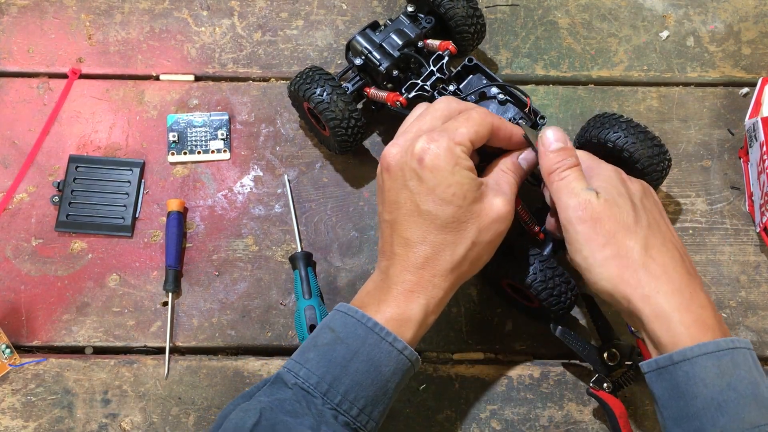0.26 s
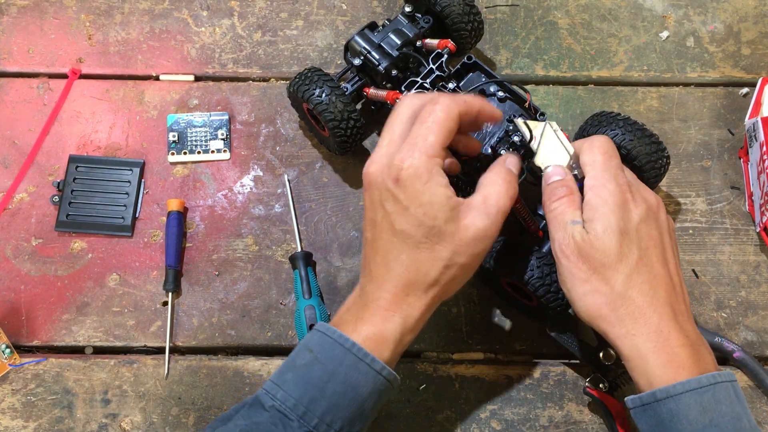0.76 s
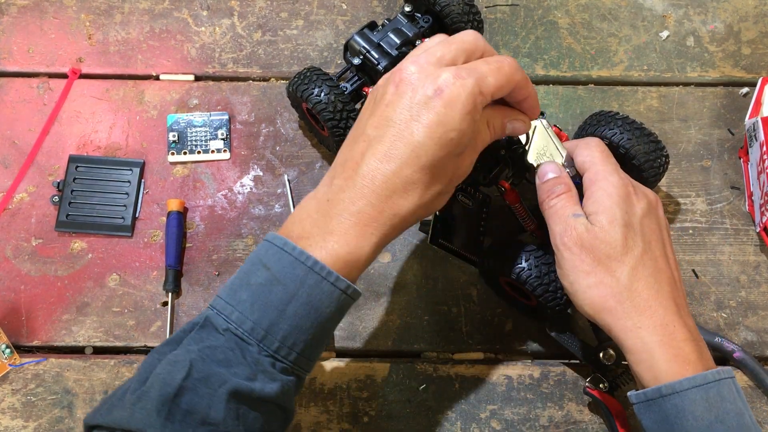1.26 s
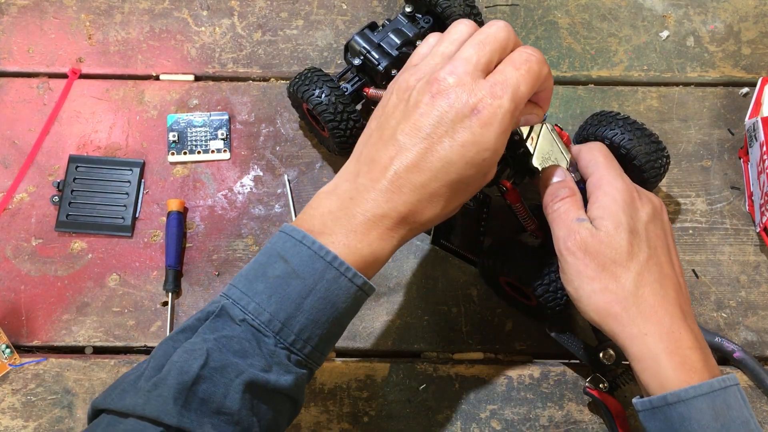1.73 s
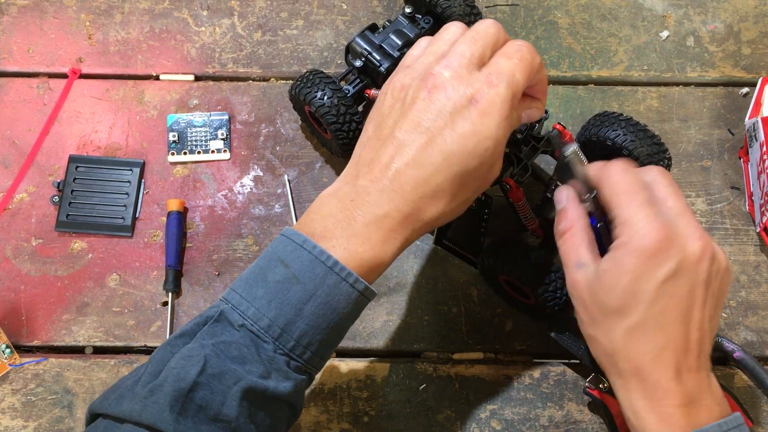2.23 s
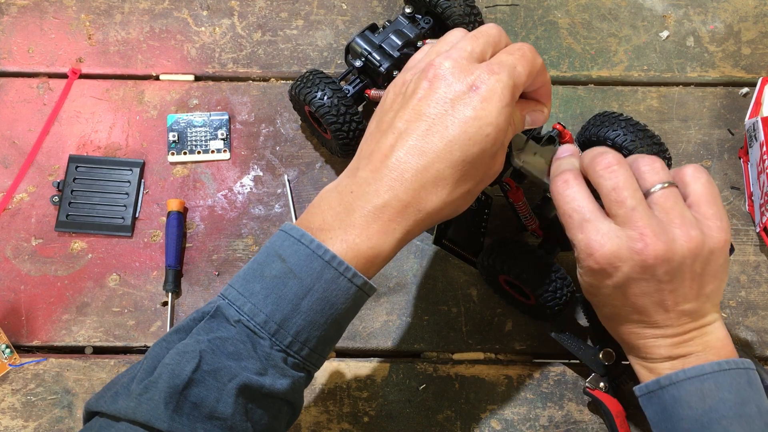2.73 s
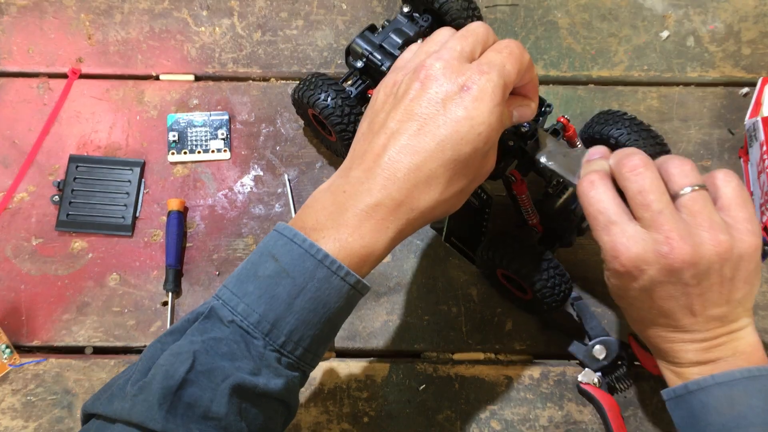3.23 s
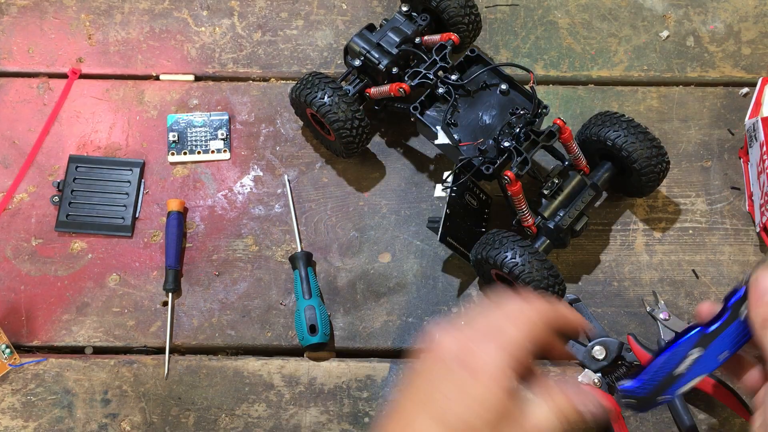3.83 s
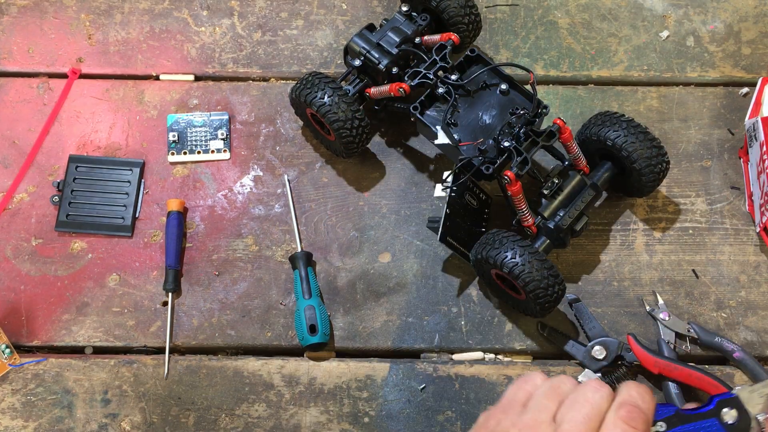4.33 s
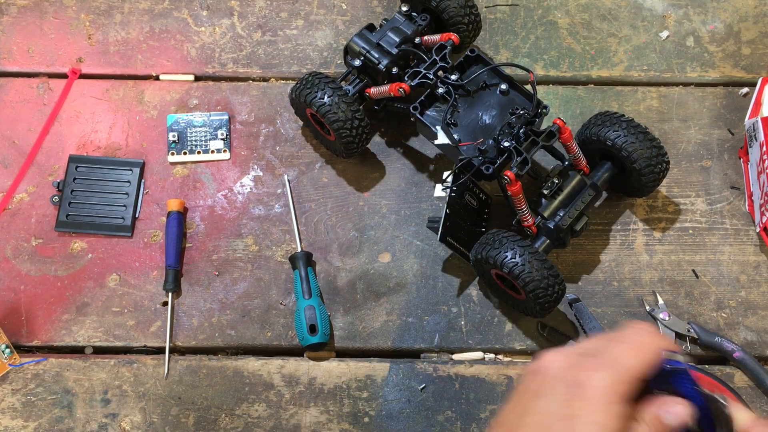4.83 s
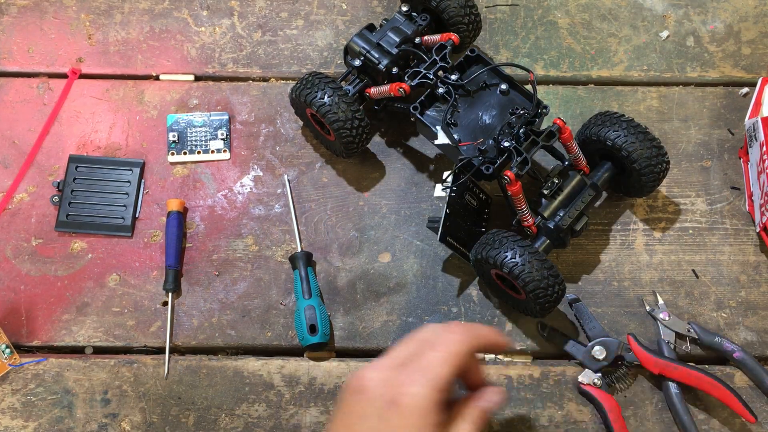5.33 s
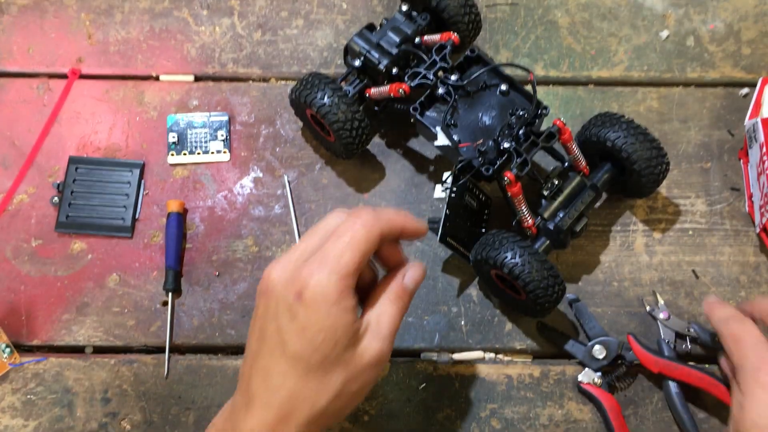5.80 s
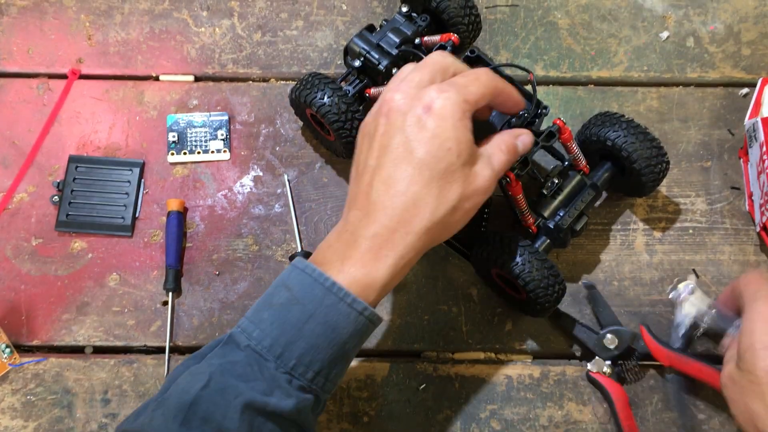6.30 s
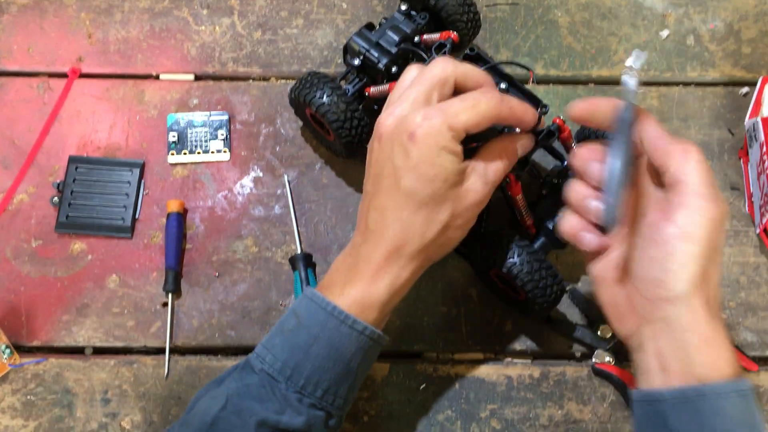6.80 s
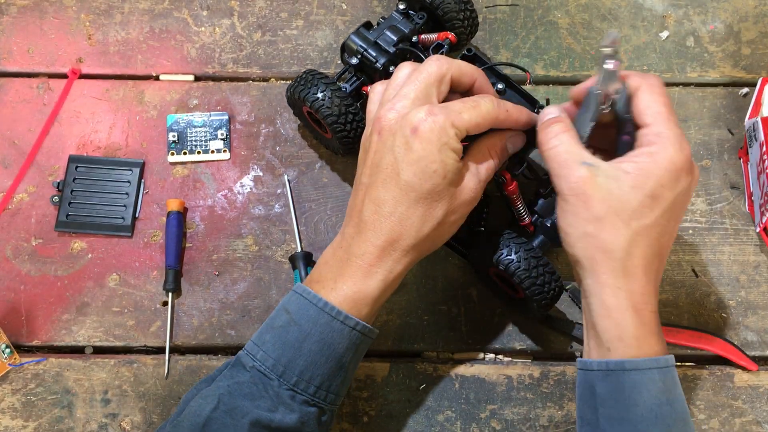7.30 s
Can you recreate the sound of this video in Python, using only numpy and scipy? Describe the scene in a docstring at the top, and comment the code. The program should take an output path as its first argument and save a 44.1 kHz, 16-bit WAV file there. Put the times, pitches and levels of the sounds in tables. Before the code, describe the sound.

Close bench work in a small shed. Barely audible metal ticks at first, then a low woody knock with a steel clink around three seconds. Soft latch clicks lead to one very loud, bright snap of a folding multi-tool near five seconds, followed by tools clattering on planks, a few softer bumps and a firm double knock. Faint low hum and hiss, short room tail.

```python
"""Bench work in a shed

Steel ticks and a loud snap from a folding knife, among knocks, drags and clatter on wooden planks, most
of them late. Ticks are gritty contacts ringing steel; knocks are bouncing blows ringing plank modes; slides
are grainy friction. Near echoes and a room tail surround them; a far machine hums over shaped room noise.
"""
import sys
import numpy as np
from scipy import signal
from scipy.fft import rfft, irfft
from scipy.io import wavfile
from scipy.ndimage import uniform_filter1d

SR = 44100
rng = np.random.default_rng(int(sys.argv[2]) if len(sys.argv) > 2 else 0)


def output_pcm(signal):
    """Save a mono or channel-first signal as 16-bit PCM at the path in sys.argv[1].

    Samples are clipped to [-1, 1] before scaling.
    """
    pcm = np.clip(np.atleast_2d(signal).T, -1, 1) * 32767
    wavfile.write(sys.argv[1], SR, np.round(pcm).astype(np.int16))


N = 332955  # length [samples]

# Metal ticks: (time [s], direct peak [dB], centre [Hz], spread [octaves, at least 0.2])
STEEL_TICKS = [(0.313, -52.5, 2820, 0.36), (0.613, -50, 7030, 0.64), (.806, -49, 1950, 0.42),
               (1.091, -41, 3370, 0.75), (1.253, -53, 4930, 0.62), (1.508, -45.5, 7450, 0.73),
               (2.843, -42, 4630, 1), (3.114, -49.5, 2400, 0.81), (3.198, -20, 2460, 0.55),
               (3.284, -34.5, 2220, 0.76), (3.339, -25, 5360, 1.4), (3.412, -42.5, 2580, 0.79),
               (3.668, -52.5, 4900, 0.97), (3.758, -52.5, 3000, 0.34), (4.934, -3, 4900, 0.71),
               (5.338, -49.5, 4470, 0.54), (5.473, -18, 2026, 1.2), (5.611, -41, 3440, 0.68),
               (5.745, -14, 4300, 0.87), (5.81, -13.5, 4330, 0.81), (6.442, -42.5, 3040, 0.97),
               (6.592, -20.5, 2520, 0.46), (6.673, -22, 2500, 0.35), (6.677, -25, 2640, 0.13),
               (6.735, -35.5, 2200, 0.2)]
# Clicks of the knife's latch: (time [s], direct peak [dB], centre [Hz], spread [octaves])
LATCH_CLICKS = [(4.446, -53, 2750, 0.9), (4.587, -35, 3220, 1.5), (4.709, -43, 3600, 1)]
# Resonances of blade and jaws: (centre [Hz], width [Hz], mean level [dB])
STEEL_MODES = [(1540, 250, -7), (2164, 110, 10), (3070, 830, -2.5), (3680, 100, -4), (4200, 260, 1.5),
               (5000, 420, -5), (5770, 440, -4), (8040, 450, -3), (8800, 840, -6.5), (11450, 1100, -1),
               (13150, 2200, -7)]
# Resonances of the latch: (centre [Hz], width [Hz], mean level [dB])
LATCH_MODES = [(2540, 130, 2), (2950, 360, -3.5), (4500, 400, -10), (5750, 620, -13), (9100, 690, 1)]
CONTACT_MS = 0.68  # time scale of the contact's swell and fade

# A loose jaw sings until it lands again: (start [s], end [s], tones (pitch [Hz], level [dB], t60 [s]))
JAW_RING = (5.533, 5.611, [(4200, -54, 0.11), (5780, -51, 1), (7500, -62, 0.43)])

# Knocks on the bench: (time [s], direct peak [dB], centre [Hz], spread [octaves, at least 0.2],
# rattle t60 [s, at least 0.01], clatter level against the plank modes [dB])
BENCH_KNOCKS = [(0.768, -45.5, 330, 1.3, 0.3, -9.5), (.82, -39, 121, 1.16, 0.046, -27),
                (0.847, -43.5, 112, 0.77, 0.025, -22), (1.092, -42, 1140, 0.36, 0.0097, 11),
                (3.185, -28.5, 245, 0.12, 0.03, -46), (3.198, -15, 256, 1.06, 0.031, -8),
                (3.222, -23.5, 160, 1.9, .04, -4), (3.261, -19.5, 170, 1.93, 0.12, -14),
                (3.34, -30.5, 334, 0.63, 0.073, -12), (3.413, -40, 586, 1.2, 0.033, -12),
                (5.472, -12.5, 1000, 0.49, 0.1, -3.5), (5.533, -17, 520, 0.66, 0.036, -12),
                (5.61, -19, 398, 1.5, 0.11, -23.5), (5.744, -20.5, 534, 1.07, 0.23, -12.5),
                (5.809, -18, 700, 1.2, 0.1, -46), (6.006, -28, 650, 1.1, 0.14, -14.5),
                (6.098, -21, 581, 0.47, 0.078, -27), (6.131, -33, 600, 0.88, 0.11, -7.5),
                (6.295, -29, 200, 0.88, 0.31, -18), (6.317, -30.5, 260, 0.99, 0.03, -15),
                (6.403, -29, 420, 0.6, 0.12, -20.5), (6.442, -32.5, 516, 1.07, 0.21, -8),
                (6.498, -34.5, 134, 0.91, 0.051, -28), (6.599, -10, 640, 0.58, 0.073, -12.5),
                (6.621, -14.5, 600, 0.4, 0.027, -8), (6.665, -19, 536, 1.15, 0.19, -15)]
# Plank modes before spot and grip: (pitch [Hz], mean level [dB], t60 [s])
PLANK_MODES = [(130.1, 13.5, 0.35), (207.4, -12.5, 0.077), (276, 8.5, 0.07), (340.5, 8, 0.22),
               (415, -5.5, 0.068), (521, 0, 0.12), (571, 5.5, 0.045), (661.6, 1, 0.11), (738, -8.5, 0.22),
               (902, -4, 0.097), (1020, 4, 0.06), (1155, -7, 0.36), (1514, -36, 0.065), (2154, -18.5, 0.06)]
MODE_FLOOR = 0.032  # share of every blow that reaches all the modes
SPOT_SHIFT = 0.015  # each blow lands on another spot or plank: spread of the upper modes' pitch, as a share
GRIP = 0.55  # a hand or tool lying on the plank shortens its upper modes to this share
CLATTER_HZ, CLATTER_OCTAVES = 1427, 0.54  # hard tool edges chatter on the wood

# Slides of steel, blade in its handle or pliers on the planks:
# (start [s], length [s], level at the top of the swell [dB], brightest [Hz])
SLIDES = [(0.758, 0.074, -64, 2970), (4.752, 0.025, -60, 5160), (4.907, 0.018, -46, 4600),
          (4.914, 0.031, -53, 3520), (6.103, 0.89, -53, 2380)]
# Resonances of sliding steel, each also passed at double width: (centre [Hz], width [Hz], level [dB])
SLIDE_MODES = [(1600, 380, 7), (2386, 260, 8), (3930, 450, -9.5), (5200, 600, -4.5), (6560, 3900, -8)]
SLIDE_TOP_AT, SLIDE_ENDS_DB = 0.66, -16.5  # share of the length where it is loudest; level at its ends
SWISH = 0.64  # broad noise beside the resonances of a slide

# Decay of the room tail: (frequency [Hz], t60 [s])
ROOM_DECAY = [(100, 0.57), (400, 0.48), (1500, 0.31), (4500, 0.4), (9000, 0.34), (16000, 0.16)]
# Near echoes: (delay [s], level [dB])
NEAR_ECHOES = [(.0022, -15.5), (.0048, -16.5), (0.0098, -14.5), (0.0169, -24.5)]
WALLS_STEEL_DB, WALLS_WOOD_DB = -6.5, -4.5  # send of steel and wood to the room tail

# Hum levels before their waver: (time [s], upper line [dB rms], lower line [dB rms])
HUM_LEVELS = [(0, -71, -69), (1.6, -61.5, -72), (3.1, -54.5, -60), (3.5, -61, -62), (3.8, -55, -55),
              (4.85, -61.5, -60.5), (5.1, -70.5, -69.5), (7.55, -70.5, -73)]
HUM_HZ, SAG_PER_S = (156.5, 88.5), 0.011  # starting pitches; share of them lost each second
# Faint thin tones before their waver: (pitch [Hz], level [dB rms])
WHINE_TONES = [(229, -83.5), (600, -86), (959, -84)]

# Colour of the room noise, evened in level before use: (frequency [Hz], density [dB per Hz])
AIR_COLOUR = [(15, -9.5), (35, 3.5), (60, -2.5), (130, -1.5), (220, -9), (400, -17), (800, -21),
              (1600, -20), (3200, -26), (6000, -29.5), (9000, -32.5), (10500, -36.5), (12800, -30.5),
              (16000, -45)]
# Setting of the hiss before lift and patches: (time [s], level [dB])
HISS_LEVELS = [(0, -65), (3.0, -65.5), (3.6, -60.5), (4.5, -62.5), (5.5, -64.5), (6.9, -57), (7.55, -60)]
RUMBLE_DB = -59  # resting level of the rumble
SHAKE_DB, SHAKE_S = -13.5, 0.044  # rumble the knocks send through the bench: level under them, smoothing
# The noise suppressor lets the hiss up after a loud crack: threshold, hold, lift
OPENS_DB, HOLD_S, LIFT_DB = -17, 0.405, 7
EDGE_HZ = 16100  # band limit


def tick(modes, db, centre_hz, octaves):
    """A short gritty contact rings the broad modes of the steel; the walls hear one smooth, weaker click."""
    t = np.arange(1500) / SR * 1000 / CONTACT_MS
    grit = t ** 2 * np.exp(-t) * rng.standard_normal(len(t))
    spectrum = rfft(grit)
    even_spectrum = spectrum / uniform_filter1d(abs(spectrum), size=25)
    grit = irfft(even_spectrum, len(t)) * (t < 9)
    wall_click = 0.66 * np.linalg.norm(grit) * signal.unit_impulse(len(t))
    contact = np.array([grit, wall_click])
    spot_db = 1.5 * rng.standard_normal(len(modes))
    ring = 0
    for (hz, width, level_db), spot in zip(modes, spot_db):
        gain = amp(level_db + spot) * favour(hz, centre_hz, octaves)
        ring = ring + gain * resonate(contact, hz, width)
    edge = 0.18 * evened(band(contact, centre_hz, 0.71 * octaves))
    sound = band(evened(ring) + edge, centre_hz, 2.0 * octaves)
    return amp(db) * sound.T / abs(sound[0]).max()


def knock(db, centre_hz, octaves, t60, clatter_db):
    """A blow, then a dying rattle of small bounces, rings the planks; hard edges chatter on top."""
    t = np.arange(SR // 2) / SR
    chance = rng.random((3, len(t)))
    bounces = (chance[0] < 800 / SR) * np.sign(chance[1] - 0.5) * chance[2]  # about 800 a second
    blows = 0.8 * bounces * amp(-60 * (t / max(t60, 0.01)) ** 1.616)
    blows[:40] += 0.085 * np.hanning(40)  # wood gives a little: the first blow is rounded
    spot_db, shift = rng.standard_normal((2, len(PLANK_MODES)))
    grip = np.r_[1, np.full(len(PLANK_MODES) - 1, GRIP)]
    shift[0] = 0  # the whole bench top keeps its note
    body = 0
    for (hz, level_db, ring_s), spot, move, hold in zip(PLANK_MODES, spot_db, shift, grip):
        decay = amp(level_db + 1.5 * spot - 60 * t / (ring_s * hold))
        struck = MODE_FLOOR + favour(hz, centre_hz, octaves)
        body = body + decay * struck * np.sin(2 * np.pi * hz * (1 + SPOT_SHIFT * move) * t)
    planks = evened(signal.fftconvolve(blows, body)[:len(t)])
    thud = evened(band(band(blows, centre_hz, 0.68 * octaves), centre_hz, 1.25 * octaves))
    clatter = evened(band(band(blows, CLATTER_HZ, CLATTER_OCTAVES), CLATTER_HZ, CLATTER_OCTAVES))
    sound = planks + 0.83 * thud + amp(clatter_db) * clatter
    # planks radiate little deep bass
    sound = signal.sosfilt(signal.butter(2, 105, "highpass", fs=SR, output="sos"), sound)
    return amp(db) * sound / abs(sound[:1500]).max()


def jaw():
    """Thin steel tones die away and are stopped short when the jaw lands."""
    start, end, modes = JAW_RING
    t = np.arange(0, end - start, 1 / SR)
    tones = sum(amp(db - 60 * t / t60) * np.sin(2 * np.pi * hz * t) for hz, db, t60 in modes)
    return start, tones * signal.windows.tukey(len(t), 0.2)


def drag(start, length, top_db, bright_hz):
    """Grainy friction through the resonances of the sliding steel: it swells, then eases off."""
    u = np.arange(0, length, 1 / SR) / length
    grit = rng.standard_normal(len(u))
    grit = grit * amp(4.8 * rng.exponential(1, len(u)).clip(0, 4))  # coarse grains
    rub = 0
    for hz, width, db in SLIDE_MODES:
        rung = resonate(resonate(grit, hz, 2 * width), hz, width)
        rub = rub + amp(db) * favour(hz, bright_hz, 0.9) * rung
    friction = evened(evened(rub) + SWISH * evened(band(grit, bright_hz, 0.84)))
    swell_db = np.interp(u, [0, SLIDE_TOP_AT, 1], [SLIDE_ENDS_DB, 0, SLIDE_ENDS_DB])
    return start, amp(top_db + swell_db) * friction * signal.windows.tukey(len(u), 0.1)


def room(direct, outward):
    """Near echoes, then tails of sparse random-sign taps whose bands die at their own speeds."""
    taps, early, late = np.zeros((3, SR)), np.zeros(2000), np.zeros(N)
    at = np.arange(300, SR - 20, 20)
    places = at + rng.integers(0, 20, (3, len(at)))
    np.put_along_axis(taps, places, rng.choice([-1., 1.], (3, len(at))), 1)
    hz, t, z = signal.stft(taps, SR, nperseg=256)
    decay = amp(-60 * t / read(ROOM_DECAY, hz)[:, None])
    tails = signal.istft(z * decay, SR, nperseg=256)[1]
    for s, db in NEAR_ECHOES:
        add(early, s, amp([db]))
    for k, tail in enumerate(tails):
        # three random tails trade places at 7 Hz, which keeps the room tail even
        turn = np.sqrt(2 / 3) * np.cos(2 * np.pi * (7 * np.arange(N) / SR + k / 6))
        late += signal.fftconvolve(outward * turn, tail / np.linalg.norm(tail))[:N]
    return signal.fftconvolve(direct, early)[:N] + late


def hum():
    """The far machine: two low sines swell, waver and sink in pitch beside a few thin steady-pitched tones."""
    t, out = np.arange(N) / SR, np.zeros(N)
    s, *levels_db = np.transpose(HUM_LEVELS)
    for hz, db in zip(HUM_HZ, levels_db):
        turns = np.cumsum(hz * (1 - SAG_PER_S * t) + 0.8 * wander(38)) / SR
        out += amp(np.interp(t, s, db) + 2.2 * wander(12)) * np.sin(2 * np.pi * turns)
    for hz, db in WHINE_TONES:
        out += amp(db + 1.0 * wander(2.3)) * np.sin(2 * np.pi * hz * t)
    return np.sqrt(2) * out  # sine peak from rms


def air(steel, wood):
    """Room noise from random short-time spectra; knocks shake the rumble up, loud cracks let the hiss up."""
    frames, hz = N // 256 + 5, np.fft.rfftfreq(1024, 1 / SR)
    a, b, patches = rng.standard_normal((frames, 513, 3)).T
    patches = evened(uniform_filter1d(uniform_filter1d(patches, 10, 0), 14, 1))
    at = np.minimum(np.arange(frames) * 256, N - 1)
    low = 1 / (1 + (hz[:, None] / 700) ** 2)  # crossover from rumble to hiss
    last_crack = np.maximum.accumulate(np.where(abs(steel) > amp(OPENS_DB), np.arange(N), -N))
    lifted = at - last_crack[at] < HOLD_S * SR
    hiss_db = np.interp(at / SR, *np.transpose(HISS_LEVELS)) + LIFT_DB * lifted
    wood_power = abs(uniform_filter1d(wood ** 2, int(SHAKE_S * SR)))
    trailing = np.maximum(at - int(SHAKE_S * SR / 2), 0)  # the shake follows the knock
    shake = amp(SHAKE_DB) ** 2 * wood_power[trailing] / (1 + (hz[:, None] / 150) ** 4)
    rumble_db = 10 * np.log10(amp(RUMBLE_DB) ** 2 + shake)
    colour = evened(amp(read(AIR_COLOUR, hz)))[:, None] / np.sqrt(len(hz))
    level = amp(low * rumble_db + (1 - low) * hiss_db + 1.3 * patches)
    return signal.istft((a + 1j * b) * colour * level, nperseg=1024, noverlap=768)[1][:N]


def favour(hz, centre_hz, octaves):
    """Where and how hard a thing is struck decides which of its modes speak."""
    return np.exp(-0.5 * (np.log2(hz / centre_hz) / max(octaves, 0.2)) ** 2)


def resonate(x, hz, width):
    """A fixed resonance of gain 1: shift its pitch to zero, smooth, and shift back."""
    turn = np.exp(2j * np.pi * hz * np.arange(x.shape[-1]) / SR)
    r = np.exp(-np.pi * width / SR)
    return 2 * (turn * signal.lfilter([1 - r], [1, -r], x / turn)).real


def band(x, centre_hz, octaves):
    """A broad band reaching these octaves to each side of the centre, steep at both edges."""
    edges = np.clip(centre_hz * 2. ** (np.array([-1, 1]) * max(octaves, 0.2)), 90, 20000)
    return signal.sosfilt(signal.butter(2, edges, "bandpass", fs=SR, output="sos"), x)


def wander(rate):
    """Slow random drift through normal draws, rate of them a second."""
    knots = int(N / SR * rate) + 2
    return np.interp(np.arange(N) / SR * rate, np.arange(knots), rng.standard_normal(knots))


def amp(db):
    """Decibels to gain."""
    return 10 ** (np.asarray(db) / 20)


def evened(x):
    """Scaled to unit rms."""
    return x / np.sqrt(np.mean(x ** 2) + 1e-20)


def read(points, hz):
    """A table read along log frequency."""
    f, value = np.transpose(points)
    return np.interp(np.log(hz + 1), np.log(f + 1), value)


def add(mix, s, sound):
    """Lays a sound into the mix at s seconds."""
    part = mix[round(s * SR):][:len(sound)]
    part += sound[:len(part)]


def scene():
    """Steel and wood close by, their echoes, the hum and the air."""
    steel, wood = np.zeros((N, 2)), np.zeros(N)  # steel: direct, towards the walls
    for modes, rows in ((STEEL_MODES, STEEL_TICKS), (LATCH_MODES, LATCH_CLICKS)):
        for s, *row in rows:
            add(steel, s, tick(modes, *row))
    for s, *row in BENCH_KNOCKS:
        add(wood, s, knock(*row))
    for row in SLIDES:
        add(wood, *drag(*row))
    direct = steel[:, 0] + wood
    outward = amp(WALLS_STEEL_DB) * steel[:, 1] + amp(WALLS_WOOD_DB) * wood
    add(direct, *jaw())
    return (direct + room(direct, outward) + hum() + air(steel[:, 0], wood))[None]


def record(dry):
    """The microphone's bass roll-off, then the band limit."""
    thin = signal.sosfilt(signal.butter(2, 45, "highpass", fs=SR, output="sos"), dry)
    lowpass = signal.firwin(511, EDGE_HZ, window=("kaiser", 9), fs=SR)
    return signal.oaconvolve(thin, lowpass[None], "same")


dry = scene()
out = record(dry)
output_pcm(out)
```